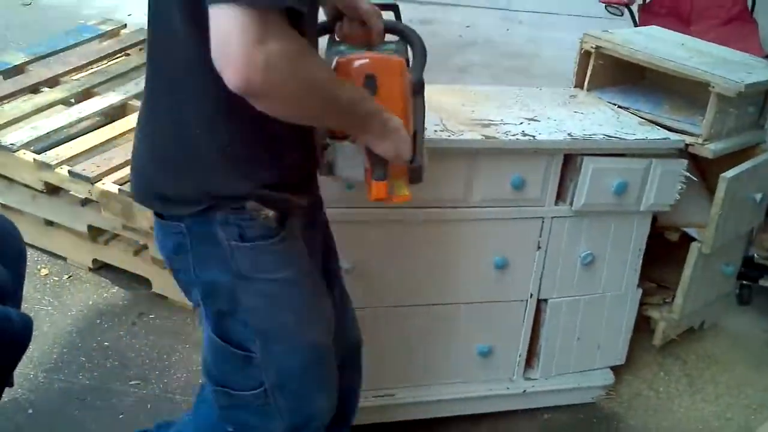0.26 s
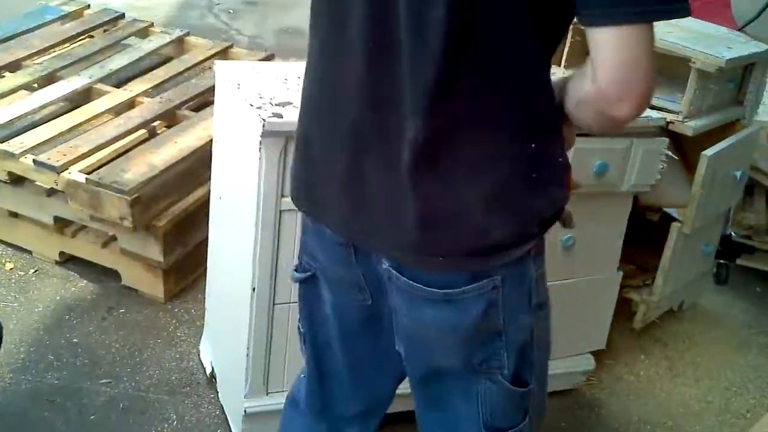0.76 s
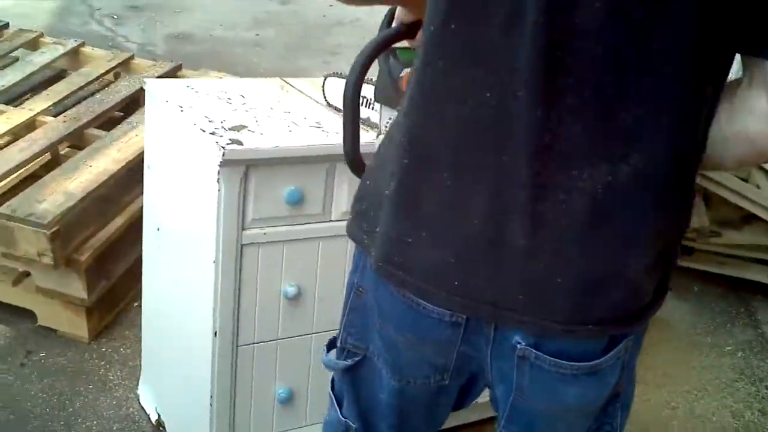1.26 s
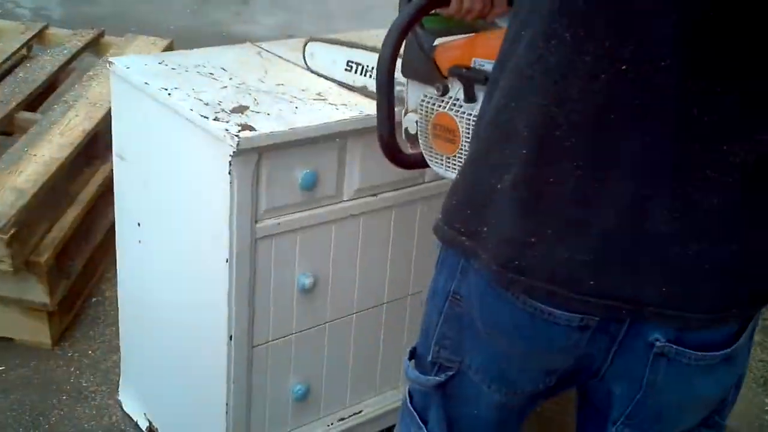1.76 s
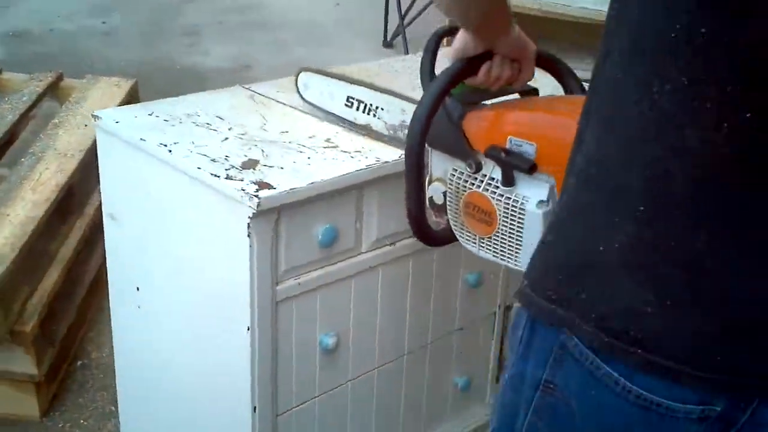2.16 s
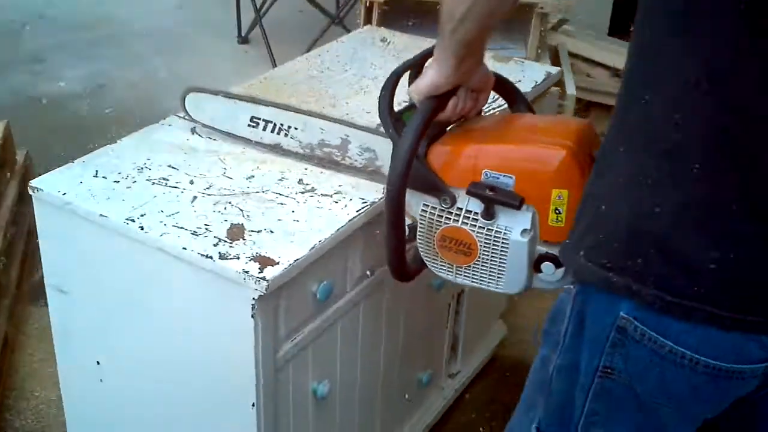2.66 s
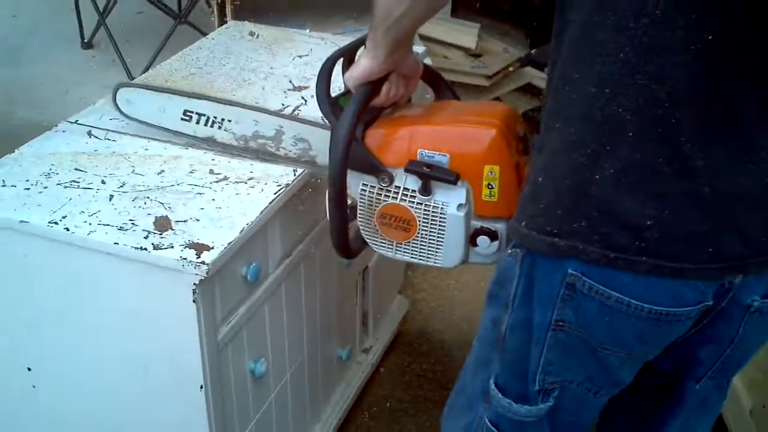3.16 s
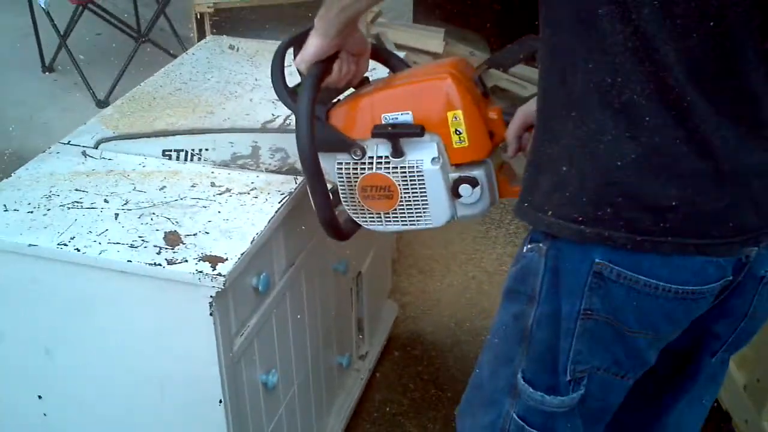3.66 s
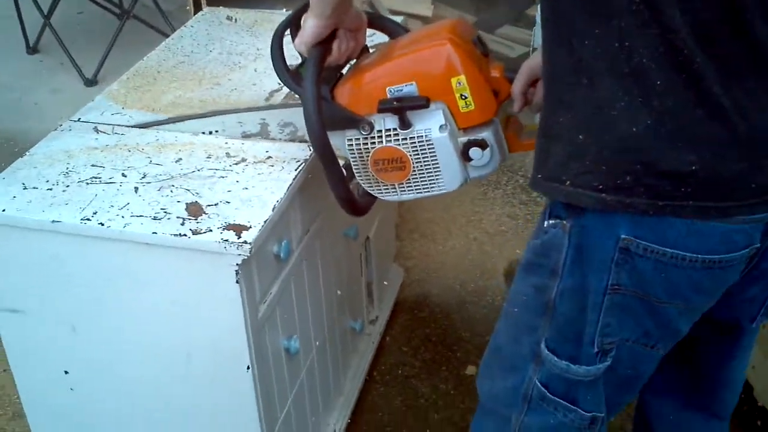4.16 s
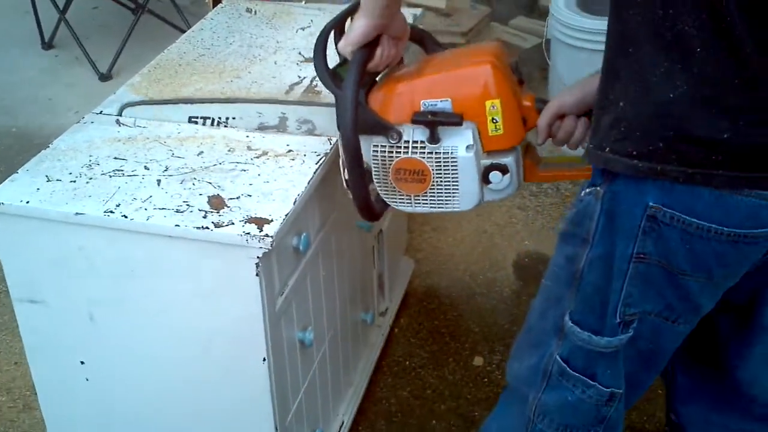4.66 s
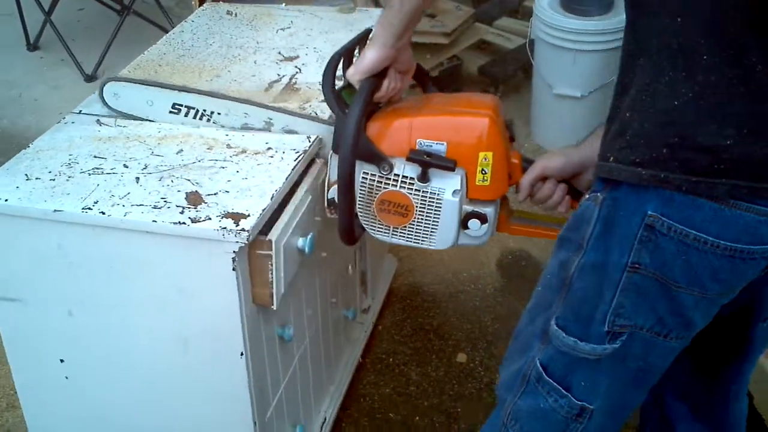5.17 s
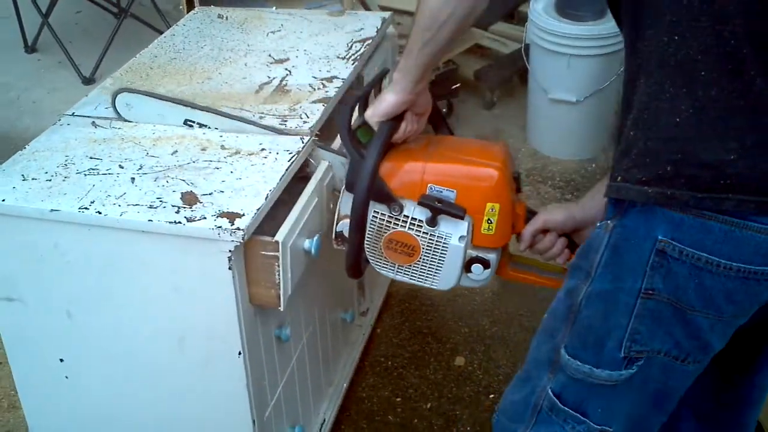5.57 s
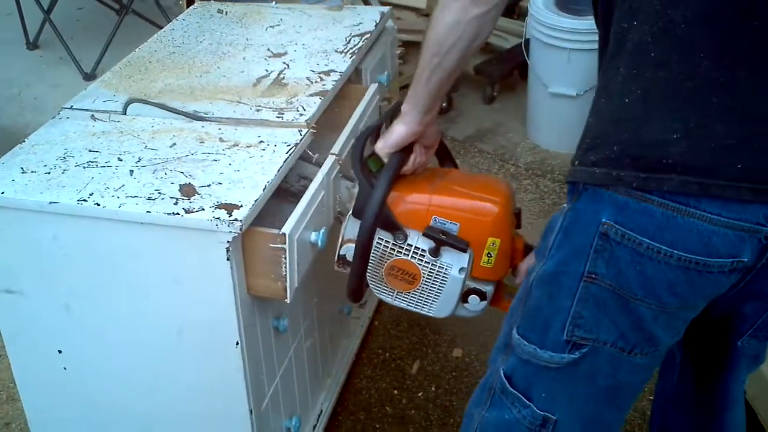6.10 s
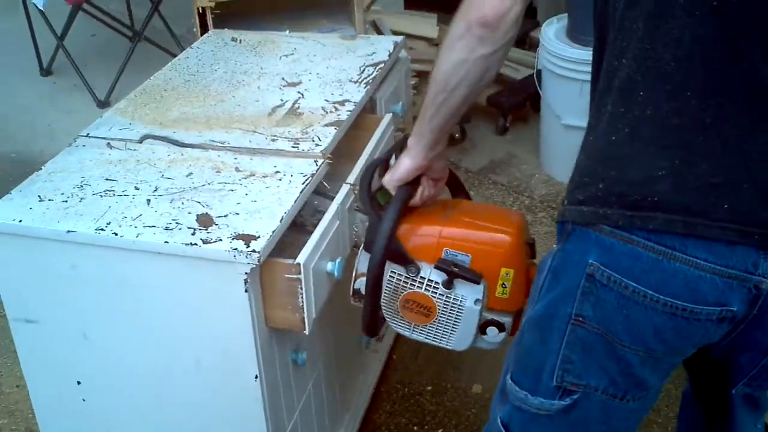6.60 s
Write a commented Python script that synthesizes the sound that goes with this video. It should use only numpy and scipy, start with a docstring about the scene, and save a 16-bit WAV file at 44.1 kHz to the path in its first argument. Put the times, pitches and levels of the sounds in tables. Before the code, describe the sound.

A petrol chainsaw coasts down to a sputtering idle, knocks onto a hollow wooden dresser, then roars up and saws in, sagging under load.

```python
"""Outdoors on concrete, close to the microphones: a two-stroke chainsaw cuts into a wooden dresser.
It coasts down to idle, is set on the dresser, revs up and saws into the top.
The engine sags as the chain bites and climbs as it clears; the hollow dresser drones and rattles.
Firing pulses excite resonant bodies; teeth, chain, gas and fan are coloured noise tied to the crank;
whines are tones at multiples of the crank speed; rattle and knocks ring decaying modes."""
import sys
import numpy as np
from scipy import signal
from scipy.fft import rfft, irfft
from scipy.io import wavfile
from scipy.ndimage import uniform_filter1d

SR = 44100
rng = np.random.default_rng(int(sys.argv[2]) if len(sys.argv) > 2 else 0)


def digitize_waveform(pressure):
    """Quantize a signal to 16-bit integers and store it at the path in sys.argv[1].

    Rows of a 2-D input are taken as channels; values are limited to [-1, 1].
    """
    field = np.atleast_2d(pressure).T
    bounded = np.clip(field, -1, 1)
    quanta = np.round(bounded * 32767).astype(np.int16)
    wavfile.write(sys.argv[1], SR, quanta)


N = 301644
T = np.arange(N) / SR  # time, s

THROTTLE_S, OPENING_S = 1.494, 0.068  # the trigger is pulled; time the throttle takes to open
COAST_S = 0.52  # the engine coasts until then, before it starts to sputter
CLEAR_S, CLEARING_S = 1.7, 0.7  # sputter gives way to even firing as the chain enters the board: start, length

# exhaust body: resonances of the muffler (f/Hz, level/dB)
MUFFLER_BODY = [(250, -37.5), (420, -12), (520, 2.5), (590, 1.5), (660, 3.5), (720, 5), (790, 0),
                (880, -12), (980, -12), (1100, -8.5), (1250, -24.5), (1650, -13), (2000, -20), (4500, -36)]
# low throb body: resonances of the housing (f/Hz, level/dB)
HOUSING_BODY = [(40, -90), (85, -32), (115, -14.5), (145, -14.5), (180, -1), (215, -16), (260, 2),
                (350, 3.5), (420, -1), (520, -1.5), (750, -21.5), (2000, -42)]
# the dresser's hollow lifts one part of the exhaust note, shifting as the drawer slides out (t/s, f/Hz)
HOLLOW_PITCH = [(1.55, 500), (1.9, 664), (2.2, 680), (3.8, 690), (4.7, 726), (5, 570), (5.25, 555),
                (5.45, 630), (5.7, 664), (5.95, 750), (6.84, 780)]
HOLLOW_WIDTH_HZ, HOLLOW_DB = 140, -6


def engine(turns, puff, rough, spread_db, exhaust_db, throb_db, throb_rough=1.2):
    """Source-filter principle: firing pulses and turbulent puffs excite muffler, hollow and housing."""
    pulses = steadied(firings(turns, spread_db))

    def fired(body, share):
        """Power-sharing mixture: pulses and turbulence pass through one body."""
        share = np.clip(share, 0, 1)
        turbulence = evened(puff * noise())
        source = np.sqrt(1 - share ** 2) * pulses + share * turbulence
        return coloured(swaying(source), body)

    exhaust = fired(MUFFLER_BODY, rough)
    exhaust += gain_of(HOLLOW_DB) * resonate(exhaust, *curves(HOLLOW_PITCH), HOLLOW_WIDTH_HZ)
    throb = fired(HOUSING_BODY, rough * throb_rough)
    return gain_of(exhaust_db) * steadied(exhaust) + gain_of(throb_db) * steadied(throb)


# the port stays open for a fixed part of a turn, which shapes each pulse (multiple of crank speed, level/dB)
PORT_HARMONICS = [(1, -1), (2, 2), (3, -2), (4, -1), (5, 3), (6, -2), (7, 1), (8, 0), (10, 0), (24, -2)]


def firings(turns, spread_db, jitter=0.0043):
    """Fourier series: one pulse a turn, differing in strength and timing; jitter is in turns per dB."""
    count = np.arange(int(turns[-1]) + 2)
    strength, late = rng.standard_normal((len(count), 2)).T
    angle = 2 * np.pi * (turns + jitter * spread_db * np.interp(turns, count, late))
    pulses = sum(gain_of(read(PORT_HARMONICS, k)) * np.cos(k * angle) for k in range(1, 25))
    return pulses * gain_of(spread_db * np.interp(turns, count, strength))


def puffs(turns, clear, idle_ebb=4.1, open_ebb=0.91, idle_rest=0.2, open_rest=0.46):
    """Exponential outflow: gas rushes out as the port opens, then ebbs; at idle the strokes stand apart."""
    ebb = np.exp(-blend(idle_ebb, open_ebb, clear) * (turns % 1))
    return steadied(blend(idle_rest, open_rest, clear) + ebb)


# reflections from the dresser, the ground and the worker (delay t/s, amplitude share)
NEAR_ECHOES = [(.0047, .28), (.0083, .22), (.0131, .16)]
SWAY_S, SWAY_HZ = .00032, 2.5  # rms wander of those delays, and its upper rate


def swaying(x):
    """Comb filtering: near reflections slide as saw and worker move, so harmonics fade and return."""
    return x + sum(share * np.interp(T - delay_s - SWAY_S * drift(SWAY_HZ), T, x)
                   for delay_s, share in NEAR_ECHOES)


# the teeth dig in (+) or slip free (-) (middle t/s, length t/s, level/dB)
TOOTH_BITES = [(.82, 0.55, 1), (.96, 0.15, 6), (2.23, 0.17, -1), (2.95, 1, 1.5), (3.335, 0.086, 3.5),
               (3.57, 0.2, -3), (5.11, 0.18, 3), (5.97, 0.62, 5), (6.38, 0.59, 2.5), (6.73, 0.58, 3.5)]
# share of turbulence in each puff (0-1): coasting, sputtering, running free, added by full load
ROUGH_COAST, ROUGH_SPUTTER, ROUGH_FREE, ROUGH_LOAD = 0.68, 0.85, 0.13, 0.1
ROUGH_BITE_PER_DB = 0.02  # a hard bite under load makes the firing more ragged
SPREAD_IDLE_DB, SPREAD_OPEN_DB = 3, 0.5  # spread of the firings' strength
# how far the hiss pulses with the firings (0-1): sputtering, running free, added by full load
PULSING_SPUTTER, PULSING_FREE, PULSING_LOAD = 0.12, 0.047, 0.023


def combustion(throttle, load):
    """Cycle-to-cycle variation: firing is ragged at idle, clears at speed, roughens with load and bites."""
    firing, clear = ramp(0, COAST_S), ramp(CLEAR_S, CLEARING_S)
    bite_db = np.maximum(arches(TOOTH_BITES), 0)
    cutting = ROUGH_FREE + load * (ROUGH_LOAD + ROUGH_BITE_PER_DB * bite_db)
    rough = blend(blend(ROUGH_COAST, ROUGH_SPUTTER, firing), cutting, clear)
    spread_db = blend(SPREAD_IDLE_DB, SPREAD_OPEN_DB, throttle)
    pulsing = blend(PULSING_SPUTTER * firing, PULSING_FREE + PULSING_LOAD * load, clear)
    return rough, spread_db, pulsing


# spectrum of the tooth noise, with a gap near 2800 Hz (f/Hz, level/dB)
TOOTH_SPECTRUM = [(70, -66.5), (130, -9.5), (300, -1.5), (550, -2), (800, 10), (1150, 3.5), (1700, 8),
                  (2200, 3), (2800, -20.5), (4000, 4.5), (5000, -1), (6000, -20)]


def teeth(turns, level_db, puff, chips_per_s=900, spread_db=0.5, chatter_db=2.0, tug=0.08):
    """Shot noise: chips snap over a buzzing rasp, tugged by each firing, chattering as the chain bounces."""
    strength = gain_of(spread_db * np.minimum(rng.exponential(1, N), 4))
    snaps = noise() * strength * (rng.random(N) < chips_per_s / SR)
    rasp = (evened(snaps) + 2 * buzz(turns)) * (1 - tug + tug * puff)
    return gain_of(level_db + chatter_db * drift(16.0)) * evened(coloured(rasp, TOOTH_SPECTRUM))


REPEAT = .4  # how much of its rasp the saw repeats from one turn to the next (0-1)


def buzz(turns, size=320):
    """Cyclic correlation: noise that partly repeats at each crank turn gathers on its multiples."""
    fresh = rng.standard_normal((int(turns[-1]) + 2, size))
    strokes = signal.lfilter([1], [1, -REPEAT], fresh, axis=0).ravel()
    rasp = np.interp(turns * size, np.arange(len(strokes)), strokes)
    return evened(np.sqrt(np.gradient(turns)) * rasp)


# colour of the steel links rushing along the bar (f/Hz, level/dB)
CHAIN_COLOUR = [(1200, -22), (2400, -7), (3200, -7), (4000, -7), (4500, -9), (5200, -11.5), (6000, -12),
                (7000, -6), (7800, 0), (8300, -1), (8800, 1.5), (9500, -5), (11000, -11), (13000, -18),
                (16000, -19)]
# colour of the gas jet from the muffler (f/Hz, level/dB)
GAS_COLOUR = [(2000, -28), (5500, -17.5), (7500, 9), (9300, 8.5), (10800, 4.5), (12000, 2), (13200, -0.5),
              (15800, -1.5)]
# colour of the flywheel fan (f/Hz, level/dB)
FAN_COLOUR = [(1200, -20), (2000, -6), (3200, -4), (4100, 0), (4600, -4), (5400, -16), (9000, -25)]
CUTTERS, CHOP = 4, .2  # cutters passing per crank turn; how deeply they chop the hiss (0-1)
GRIT_DB = 1.5  # the hiss comes in tiny uneven spurts: their spread


def hiss(turns, speed, puff, pulsing, chain_db, gas_db, flutter_db=9.5, fan_db=-27, fan_power=4.3):
    """Amplitude modulation: firings and cutters chop chain and gas noise; fan level follows a speed power."""
    beat = evened(1 - pulsing + pulsing * puff) * gain_of(flutter_db * 2 * pulsing * drift(17.6))
    cutter = 2 * np.pi * CUTTERS * turns
    chop = 1 + CHOP * (np.sin(cutter) + .5 * np.sin(2 * cutter))
    chain = gain_of(chain_db) * evened(coloured(noise(), CHAIN_COLOUR))
    gas = gain_of(gas_db) * evened(coloured(noise(), GAS_COLOUR))
    fan_gain = gain_of(fan_db) * (speed / speed.max()) ** fan_power
    fan = fan_gain * evened(coloured(buzz(turns), FAN_COLOUR))
    grit = evened(gain_of(GRIT_DB * drift(500, size=16)))
    return beat * chop * grit * (chain + gas) + fan


# tones of cutters (every fourth multiple) and fan (multiple of crank speed, level/dB against tooth noise)
WHINE_TONES = [(8, -15), (10, -19), (12, -12), (16, -12), (18, -20), (20, -16), (24, -18), (28, -24)]
# bar, housing or a panel sings with one multiple (start t/s, end t/s, multiple of crank speed, level/dB)
SINGING_TONES = [(-.5, .62, 5, -46), (-.4, .55, 4, -49.5), (-.3, .5, 6, -45), (.12, .7, 16, -41),
                 (0.616, .98, 16, -35), (0.806, 1.02, 7, -31), (.4, 1.37, 2, -47), (1.246, 1.697, 2, -45.5),
                 (1.696, 1.86, 7, -27), (1.703, 2.057, 2, -39), (1.808, 1.933, 12, -28.5),
                 (1.983, 2.503, 8, -32.5), (2.252, 2.85, 3, -25.5), (2.35, 3.353, 10, -34),
                 (2.75, 3.15, 9, -33), (2.65, 3.296, 6, -31.5), (2.105, 2.813, 24, -30),
                 (2.35, 3.4, 26, -31.5), (2.45, 3.245, 22, -37), (3.004, 3.353, 24, -31),
                 (3.348, 3.845, 8, -30), (3.45, 4.555, 16, -39), (4.088, 4.4, 7, -32), (4.1, 4.6, 24, -53),
                 (4.393, 4.923, 6, -23.5), (4.496, 4.897, 4, -29.5), (4.7, 5.302, 7, -24),
                 (5.25, 5.894, 12, -30), (5.4, 5.85, 24, -49), (5.89, 6.117, 16, -34),
                 (6.417, 6.666, 12, -21), (6.45, 6.647, 16, -28), (6.46, 6.71, 4, -27)]
IDLE_FRAY, WHINE_FRAY = .1, .037  # phase jitter, throttle shut and open (radians per multiple)
WHINE_WAVER_DB = 3.5


def whine(turns, throttle, wood_db):
    """Order locking: tones ride on multiples of the crank; some swell where a part resonates."""
    wood, fray = gain_of(wood_db), blend(IDLE_FRAY, WHINE_FRAY, throttle)
    power = {k: (wood * gain_of(db)) ** 2 for k, db in WHINE_TONES}
    for start, end, k, db in SINGING_TONES:
        swell = gain_of(db) * np.sin(np.pi * ramp(start, end - start))
        power[round(k)] = power.get(round(k), 0) + swell ** 2
    return sum(np.sqrt(p) * tone(turns, k, fray, WHINE_WAVER_DB) for k, p in power.items())


def tone(turns, multiple, fray, waver_db):
    """Phase modulation: the crank's unevenness frays high multiples most, while the level wavers."""
    waver = evened(gain_of(waver_db * drift(7)))
    phase = 2 * np.pi * (round(multiple) * turns + rng.random())
    return np.sqrt(2) * waver * np.cos(phase + fray * multiple * drift(45))


# steel modes of the bar and clutch drum (f/Hz, level/dB)
STEEL_MODES = [(810, -5), (1500, -6), (3330, 0), (3980, 7.5), (6800, 6.5), (9200, -10), (11900, -14),
               (12750, 0), (15500, 1)]


def rattle(speed, puff, level_db=-36, clutch_hz=85, taps_per_s=350, t60=0.028):
    """Modal excitation: until the clutch grips, each firing shakes the slack chain against the bar."""
    t = np.arange(SR // 20) / SR
    out = np.zeros(N)
    for hz, db in STEEL_MODES:
        taps = noise() * (rng.random(N) < puff ** 2 * taps_per_s / SR)
        ring = gain_of(db - 60 * t / t60) * np.sin(2 * np.pi * hz * t)
        out += signal.oaconvolve(taps, ring)[:N]
    slack = np.clip((clutch_hz - speed) / (clutch_hz - speed.min()), 0, 1)
    return gain_of(level_db) * slack * evened(out)


# the chain snags and the bar knocks on the dresser
# (t/s, peak level/dB before the common level, level of the low panels/dB relative to the others)
BAR_KNOCKS = [(0.586, -12, -5), (0.686, -11, 2), (0.755, -8.5, -3), (0.796, -10, -12), (0.824, -12, 15),
              (0.843, -8, 5), (0.888, -7.5, -3), (0.916, -17, 6), (0.94, -6.5, -10), (0.961, -4, -1),
              (0.985, -10, 6), (1.367, -14, -7), (1.414, -16, -11), (3.322, -6, -14), (5.115, -8, -5),
              (5.876, -8, -14), (5.915, -6, -19), (6.641, -1, -5), (6.709, -5.5, 2)]
# ring of the dresser's panels (f/Hz, level/dB, t60/s)
PANEL_MODES = [(235, -4.5, 0.039), (310, -2, .09), (366, 1.5, 0.098), (413, 0, 0.16), (477, 3, .08),
               (797, 3.5, 0.068), (1030, 3, .032), (1540, 4.5, 0.029), (1990, 6, 0.052)]
# colour of the teeth's short scrape (f/Hz, level/dB)
SCRAPE_COLOUR = [(150, -43), (500, -7), (1000, 4), (1700, -1.5), (2800, -6), (4200, -15), (7000, -29)]


def knocks(level_db=-7, clack=0.98, clack_s=0.027, low_hz=600):
    """Modal superposition: each knock rings the panels in its own mix, with a short scrape of the teeth."""
    out, t = np.zeros(N), np.arange(SR // 8) / SR
    for s, peak_db, low_db in BAR_KNOCKS:
        ring = np.zeros(len(t))
        for hz, db, t60 in PANEL_MODES:
            decay = gain_of(db + low_db * (hz < low_hz) - 60 * t / t60)
            ring += rng.uniform(-1.16, 1) * decay * np.sin(2 * np.pi * hz * t)
        scrape = evened(coloured(noise(), SCRAPE_COLOUR))[-len(t):] * np.exp(-t / clack_s)
        blow = ring + clack * scrape
        part = out[round(s * SR):][:len(t)]  # a view: adding to it adds to out
        part += (gain_of(peak_db + level_db) * blow / abs(blow).max())[:len(part)]
    return out


# how much of the yard's echo reaches the microphones (f/Hz, level/dB)
YARD_COLOUR = [(100, -1), (300, -3.5), (480, -6), (650, -11), (1200, -13), (2200, -16), (3000, -34)]


def yard(x, t60=0.31):
    """Diffuse reverberation: a short dull scatter from the ground, the pallets and the furniture."""
    t = np.arange(SR // 3) / SR
    taps = rng.standard_normal(len(t)) * gain_of(-60 * t / t60) * (t > .003)
    return coloured(signal.oaconvolve(x, taps / np.linalg.norm(taps))[:N], YARD_COLOUR)


# left against right microphone (f/Hz, level/dB)
LEFT_RIGHT_BALANCE = [(60, 1), (170, 1.5), (260, 4.5), (430, 5), (620, .7), (850, 1.5), (1080, 3),
                      (1300, 0), (1580, 0), (1850, -3.5), (2250, -3.5), (2700, 0), (3300, 0), (3650, -2.5),
                      (4100, 0)]
LAG_S, LAG_FROM_HZ = .00034, 1470


def microphones(x, lag_s):
    """Interchannel delay: both sides hear the bass together; in the treble the right lags by lag_s."""
    hz = np.fft.rfftfreq(N, 1 / SR)
    lag = np.exp(-2j * np.pi * lag_s * np.maximum(hz - LAG_FROM_HZ, 0))
    lean = gain_of(read(LEFT_RIGHT_BALANCE, hz) / 2)
    return irfft(rfft(x) * np.array([lean, lag / lean]), N)


# the bar rubs on the wood and the chain hisses (middle t/s, length t/s, level/dB)
BAR_RUBS = [(.83, 0.66, 4.5), (1.45, 0.61, 5), (3.37, 0.43, 5.5), (5.68, 0.17, 2), (6.47, 0.79, 5)]
# the exhaust note swells (+) or dips (-) as the saw is moved about (middle t/s, length t/s, level/dB)
EXHAUST_SWELLS = [(.95, 0.33, 5), (1.6, 0.13, 0.5), (1.91, 0.068, -5), (2.12, 0.06, -6), (2.26, 0.15, 2.5),
                  (2.72, 0.082, -10), (2.9, 0.46, 0.5), (3.21, 0.15, -4), (3.75, 1, 2.5),
                  (4.19, 0.28, -4.5), (4.7, 0.36, 0), (5.65, 0.52, 2.5), (6.11, 0.079, -4),
                  (6.27, 0.066, -5)]
# the low throb swells (+) or dips (-) (middle t/s, length t/s, level/dB)
THROB_SWELLS = [(2.3, 0.68, -4), (2.8, 0.32, 3.5), (3.7, 0.46, -0.5), (4.65, 1.1, 0), (5.65, 0.27, 1.5),
                (6, 0.51, -2.5), (6.35, 0.57, -5.5)]
SINK_S, SINKING_S = 2.63, 1.5  # the bar sinks into the top: start, length
GAS_RISE_S = 0.18  # the gas jet takes longer to build than the throttle to open
# base levels with the throttle shut and open, then changes while coasting, cutting, sunk or at full load
EXHAUST_SHUT_DB, EXHAUST_OPEN_DB = -43, -21.5
THROB_SHUT_DB, THROB_OPEN_DB, THROB_COAST_DB, THROB_LOAD_DB = -34.5, -31, -16.5, 2
TEETH_SHUT_DB, TEETH_OPEN_DB, TEETH_CUT_DB = -35, -30.5, 3.5
CHAIN_SHUT_DB, CHAIN_OPEN_DB, CHAIN_SUNK_DB, CHAIN_LOAD_DB = -32, -28.5, 3, 4.5
GAS_SHUT_DB, GAS_OPEN_DB, GAS_SUNK_DB = -32.5, -18, -2.5
RUB_GAS, BITE_DRONE = 0.71, 0.6  # share of a rub's dB in the gas jet; of a bite's dB in the low throb


def levels(throttle, load):
    """Additive decibels: throttle lifts every part; as the bar sinks, chain rises and gas is shaded."""
    sunk, bite_db, rub_db = ramp(SINK_S, SINKING_S), arches(TOOTH_BITES), arches(BAR_RUBS)
    exhaust_db = blend(EXHAUST_SHUT_DB, EXHAUST_OPEN_DB, throttle) + arches(EXHAUST_SWELLS)
    throb_db = blend(THROB_SHUT_DB, THROB_OPEN_DB, throttle)
    throb_db += THROB_COAST_DB * (1 - ramp(0, COAST_S))
    throb_db += THROB_LOAD_DB * load + BITE_DRONE * bite_db + arches(THROB_SWELLS)
    wood_db = blend(TEETH_SHUT_DB, TEETH_OPEN_DB, throttle)
    wood_db += TEETH_CUT_DB * ramp(CLEAR_S, CLEARING_S) + bite_db
    chain_db = blend(CHAIN_SHUT_DB, CHAIN_OPEN_DB, throttle)
    chain_db += CHAIN_SUNK_DB * sunk + CHAIN_LOAD_DB * load + rub_db
    gas_db = blend(GAS_SHUT_DB, GAS_OPEN_DB, ramp(THROTTLE_S, GAS_RISE_S))
    gas_db += GAS_SUNK_DB * sunk + RUB_GAS * rub_db
    return exhaust_db, throb_db, wood_db, chain_db, gas_db


def gain_of(db):
    """Logarithmic level: decibels to amplitude."""
    return 10 ** (np.asarray(db) / 20)


def evened(x):
    """Power normalization: scales to unit rms."""
    return x / np.sqrt(np.mean(x ** 2) + 1e-20)


def steadied(x, size=3500):
    """Short-term power normalization: scales to unit rms from moment to moment."""
    power = uniform_filter1d(uniform_filter1d(x ** 2, size), size)
    return x / np.sqrt(abs(power) + 1e-20)


def curves(rows):
    """Linear interpolation: one value per sample for each column of a time table."""
    s, *columns = np.transpose(rows)
    return [np.interp(T, s, column) for column in columns]


def read(points, hz):
    """Logarithmic frequency scale: reads a spectrum between its points."""
    f, value = np.transpose(points)
    return np.interp(np.log(hz + 1), np.log(f + 1), value)


def coloured(x, points, size=4096):
    """Minimum-phase filtering: passes x through a causal body with the given spectrum."""
    log_gain = np.log(gain_of(read(points, abs(np.fft.fftfreq(size, 1 / SR)))))
    ring = np.fft.ifft(np.exp(np.conj(signal.hilbert(log_gain)))).real
    return signal.oaconvolve(x, ring[:size // 2])[:N]


def resonate(x, hz, width_hz):
    """Heterodyne resonance: a one-pole resonator of gain 1 follows the curve hz."""
    turn, r = np.exp(2j * np.pi * np.cumsum(hz) / SR), np.exp(-np.pi * width_hz / SR)
    return 2 * (turn * signal.lfilter([1 - r], [1, -r], x / turn)).real


def noise():
    """White spectrum: Gaussian noise of unit variance."""
    return rng.standard_normal(N)


def drift(hz, size=64):
    """Band-limited noise: slow chance of unit rms, up to about hz."""
    count = N // size + 2
    rolloff = 1 + (np.fft.rfftfreq(count, size / SR) / hz) ** 4
    slow = irfft(rfft(rng.standard_normal(count)) / rolloff, count)
    return np.interp(np.arange(N) / size, np.arange(count), evened(slow))


def ramp(start_s, length_s):
    """Linear onset: rises from 0 to 1 and stays there."""
    return np.clip((T - start_s) / length_s, 0, 1)


def blend(a, b, share):
    """Linear mixing: goes from a to b as share goes from 0 to 1."""
    return a + (b - a) * share


def arches(rows):
    """Raised-cosine envelope: a smooth rise and fall in dB for each event."""
    return sum(db * np.sin(np.pi * ramp(middle - length / 2, length)) ** 2
               for middle, length, db in rows)


# crank speed with the throttle shut, then just opened (t/s, f/Hz in turns per second)
IDLE_SPEED = [(0, 89), (.2, 78), (.4, 70.5), (.6, 63), (.75, 56), (.88, 51), (1.05, 57), (1.47, 55),
              (1.55, 66), (1.63, 78)]
# crank speed at full throttle (t/s, f/Hz in turns per second)
CUTTING_SPEED = [(1.75, 96.7), (1.85, 120.3), (1.93, 136.8), (2.03, 152), (2.14, 163.5), (2.33, 171.5),
                 (2.49, 169), (2.64, 168.9), (2.75, 174.6), (2.91, 177.6), (3.01, 177.4), (3.22, 170.3),
                 (3.44, 142.9), (3.6, 137.4), (3.7, 143.7), (3.88, 144.8), (4.12, 135.7), (4.33, 135),
                 (4.59, 125.9), (4.88, 120), (4.95, 115.8), (5.02, 107.8), (5.25, 109.7), (5.39, 123),
                 (5.66, 131.2), (5.78, 127.3), (5.9, 108.7), (5.96, 103.6), (6.07, 104.2), (6.27, 112.4),
                 (6.42, 110.1), (6.53, 104.5), (6.67, 106.5), (6.73, 104.9), (6.84, 115)]
FREE_HZ, BOGGED_HZ = 141, 86.5  # crank speed with no load and with full load
SECOND_SHARE = .27  # power share of a second, independent rasp and hiss whose treble leads on the right


def scene():
    """Common drive: the crank drives every part; in the cut, the more it sags, the greater the load."""
    speed, = curves(np.vstack([IDLE_SPEED, CUTTING_SPEED]))
    throttle = np.sin(np.pi / 2 * ramp(THROTTLE_S, OPENING_S))
    sag = np.clip((FREE_HZ - speed) / (FREE_HZ - BOGGED_HZ), 0, 1)
    load = sag * ramp(CLEAR_S, CLEARING_S)
    exhaust_db, throb_db, wood_db, chain_db, gas_db = levels(throttle, load)
    rough, spread_db, pulsing = combustion(throttle, load)
    turns = np.cumsum(speed * (1 + 0.0017 * drift(12.9))) / SR
    puff = puffs(turns, throttle)

    def rasp_and_hiss(share):
        """Incoherent sources: each call draws fresh noise with the given share of the power."""
        rasp = teeth(turns, wood_db, puff)
        return np.sqrt(share) * (rasp + hiss(turns, speed, puff, pulsing, chain_db, gas_db))

    saw = rasp_and_hiss(1 - SECOND_SHARE)
    second = rasp_and_hiss(SECOND_SHARE)
    saw += engine(turns, puff, rough, spread_db, exhaust_db, throb_db)
    saw += whine(turns, throttle, wood_db) + rattle(speed, puff) + knocks()
    echo = np.array([yard(saw), yard(saw)])  # independent scatter on each side
    return microphones(saw, LAG_S) + microphones(second, -LAG_S) + echo


EDGE_HZ = 15780  # upper edge of the treble


def record(dry):
    """Band limiting and soft saturation: cuts deep bass, rounds the highest peaks, drops the top treble."""
    thin = signal.sosfilt(signal.butter(6, 100, "highpass", fs=SR, output="sos"), dry)
    held = thin / (1 + (thin / .9) ** 8) ** (1 / 8)
    lowpass = signal.firwin(511, EDGE_HZ, window=("kaiser", 9), fs=SR)
    return signal.oaconvolve(held, lowpass[None], "same")


dry = scene()
out = record(dry)
digitize_waveform(out)
```